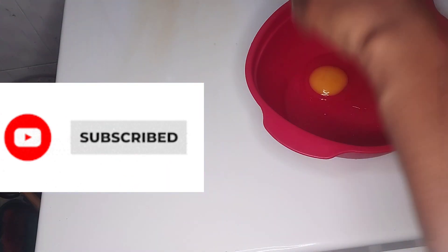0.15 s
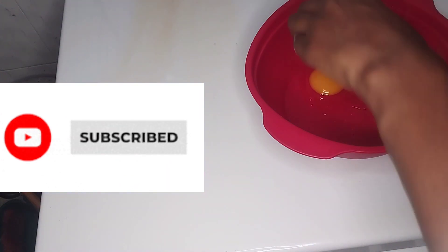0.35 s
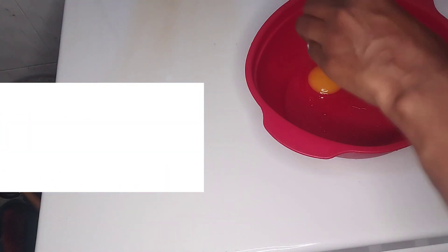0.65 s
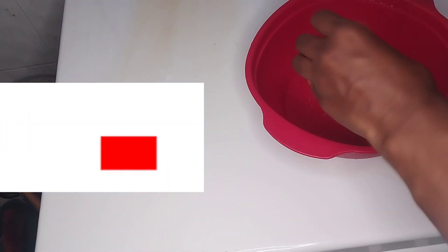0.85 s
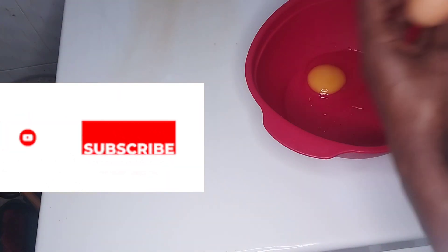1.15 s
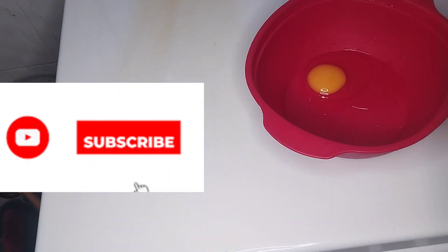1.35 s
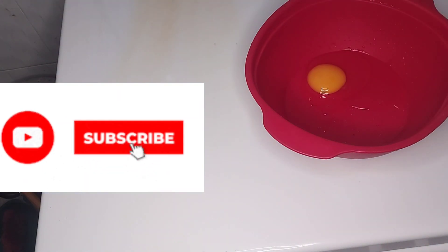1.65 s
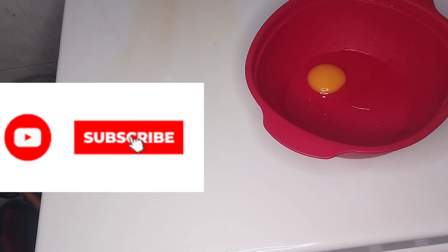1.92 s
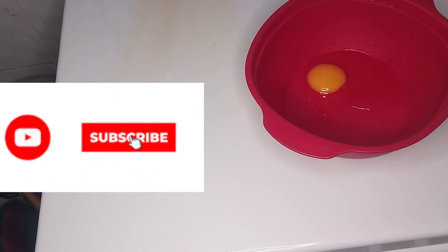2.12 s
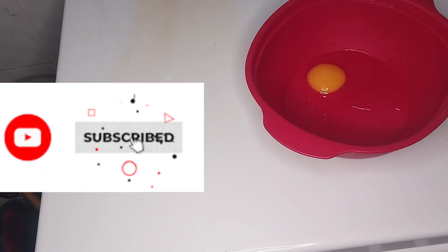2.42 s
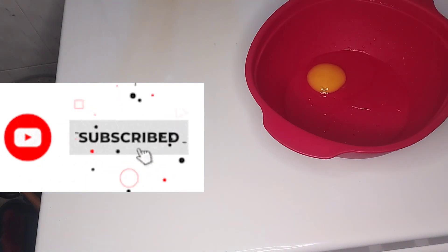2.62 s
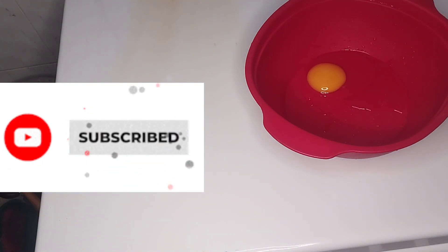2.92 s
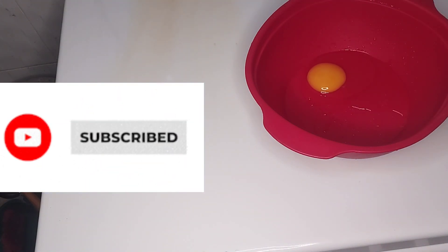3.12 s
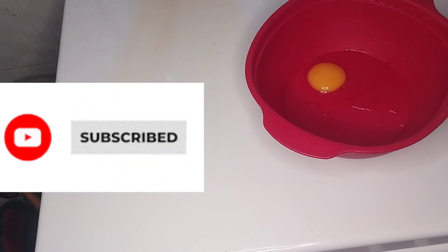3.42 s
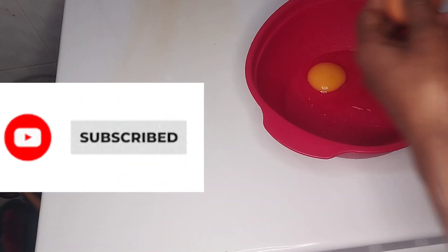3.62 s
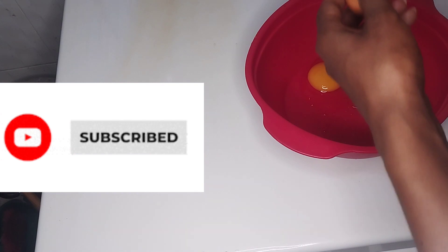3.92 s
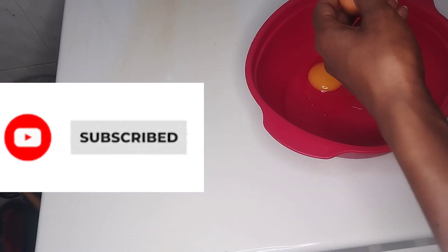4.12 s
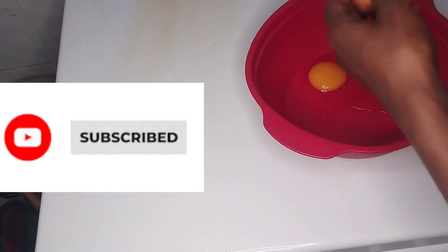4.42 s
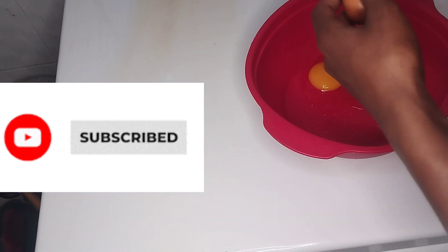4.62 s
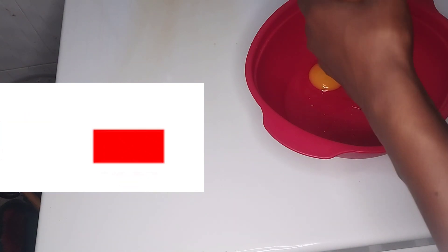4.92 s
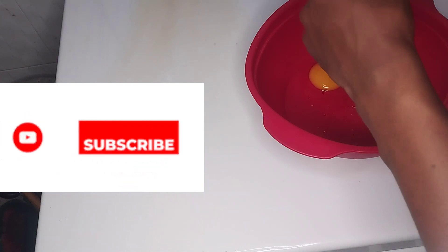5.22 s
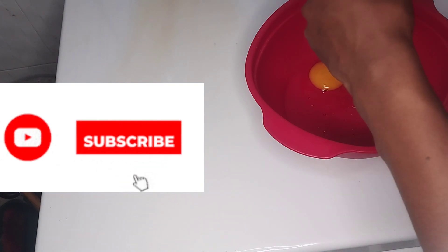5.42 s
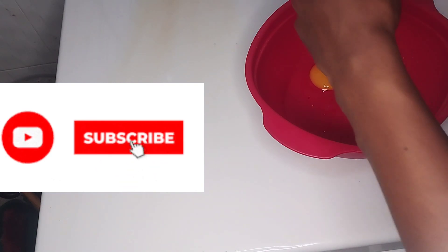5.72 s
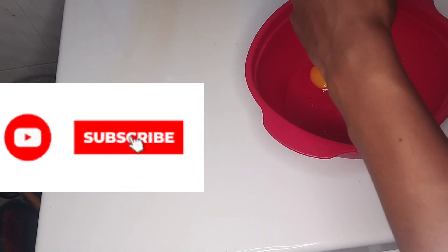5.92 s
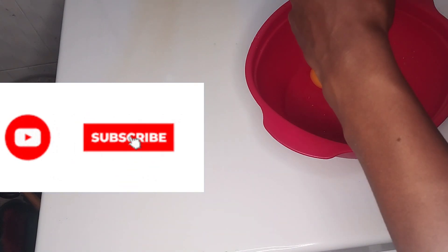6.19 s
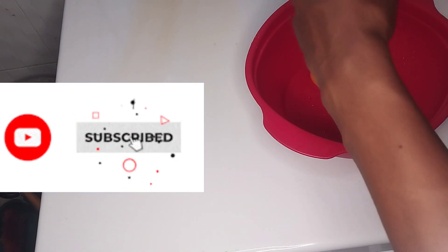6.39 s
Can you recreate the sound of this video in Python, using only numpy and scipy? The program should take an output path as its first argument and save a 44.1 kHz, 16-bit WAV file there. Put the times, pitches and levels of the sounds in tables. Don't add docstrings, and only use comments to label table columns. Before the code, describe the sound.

Quiet handling comes first: hollow eggshell touches, dry finger rubs, light scrapes, then a strong knock of hand or bowl on the counter. Padded bumps follow. Two bright, very close egg cracks on a plastic bowl ring round the live kitchen, the second louder. Brittle flakes snap and nails scrape until a short descending tear opens the shell. A distant motor hums low underneath, swelling now and then.

```python
import sys
import numpy as np
from scipy import signal
from scipy.fft import rfft, irfft
from scipy.io import wavfile

SR = 44100
rng = np.random.default_rng(int(sys.argv[2]) if len(sys.argv) > 2 else 0)


def invert_db(level):
    return 10 ** (np.asarray(level, dtype=float) / 20)


def wav_out(sig):
    wavfile.write(sys.argv[1], SR, np.round(np.clip(np.atleast_2d(sig).T, -1, 1) * 32767).astype(np.int16))


N = 288855

# frequency in Hz, level in dB.
SHELL_TONE = [(120, -76), (200, -19), (335, 0.5), (368, -3.5), (485, -0.5), (715, -10), (844, -9),
              (926, -15.5), (1500, -6.5), (2050, -12.5), (4530, -4.5), (6200, -2.5), (7880, -11),
              (15000, -9), (16500, -7.5)]

PORT_LAG = 11


def rms_one(x):
    return x / np.sqrt(np.mean(x ** 2) + 1e-20)


def at_hz(points, hz):
    points = np.array(points)
    return np.interp(np.log(hz), np.log(points[:, 0]), points[:, 1])


def band(x, low_hz, high_hz):
    edges_hz = [low_hz, min(high_hz, 0.45 * SR)]
    return signal.sosfilt(signal.butter(2, edges_hz, "band", fs=SR, output="sos"), x)


def colour(x, spectrum, size=4096):
    hz = np.arange(size // 2 + 1) * SR / size + 1
    cepstrum = irfft(np.log(invert_db(at_hz(spectrum, hz))))
    cepstrum[1:size // 2] *= 2
    cepstrum[size // 2 + 1:] = 0
    response = irfft(np.exp(rfft(cepstrum)))
    return signal.fftconvolve(x, [response / np.linalg.norm(response)], axes=1)[:, :N]


def ring(x, hz, t60):
    radius = invert_db(-60 / (t60 * SR))
    turn = 2 * np.pi * hz / SR
    return signal.lfilter([0, np.sin(turn)], [1, -2 * radius * np.cos(turn), radius * radius], x + 1e-18)


def diffuse(size, gain):
    # frequency in Hz, likeness from 0 to 1.
    likeness = [(20, 0.098), (60, 1), (130, 0.49), (400, 0.63), (1000, 0.064), (16000, 0.02)]
    out = 0
    edges = 10 * 2 ** np.arange(0, 11.1, 0.5)
    white = rng.standard_normal((2, 2, size))
    for k, (low, high) in enumerate(zip(edges, edges[1:])):
        mid, side = band(white[k % 2], low, high)
        centre = np.sqrt(low * high)
        alike = np.clip(at_hz(likeness, centre), 0, 1)
        stereo = np.sqrt(1 + alike) * mid + np.sqrt(1 - alike) * side * [[1], [-1]]
        out = out + gain(centre) * stereo
    return out


def kitchen(x, build_ms):
    # frequency in Hz, t60 in seconds.
    decay = [(150, 0.22), (400, 0.38), (1040, 0.36), (2760, 0.34), (7280, 0.3)]
    t = np.arange(int(0.6 * SR)) / SR

    def envelope(hz):
        swell = 1 - np.exp(-1000 * t / build_ms * (hz / 1000) ** 0.6)
        return swell * invert_db(-60 * t / at_hz(decay, hz))

    tail = diffuse(len(t), envelope)
    return signal.fftconvolve(x, tail / np.sqrt(np.sum(tail ** 2) / 2), axes=1)[:, :N]


def bursts(times, levels_db, lengths_ms, tops_hz=1e6):
    size = 4096
    out = np.zeros((*np.shape(levels_db)[:-1], N + size))
    noise = rng.standard_normal((len(times), size))
    age = np.arange(size) / SR * 2000 / np.maximum(lengths_ms, 0.1)[:, None]
    shape = age * np.exp(1 - age)
    for _ in range(4):
        spectrum = rfft(noise * shape ** 0.3)
        noise = irfft(spectrum / np.abs(spectrum))
    hz = np.arange(size // 2 + 1) * SR / size
    dulling = (1 + 1j * hz / np.reshape(tops_hz, (-1, 1))) ** -3
    noise = irfft(rfft(noise) * dulling) * np.sqrt(np.sum(shape ** 2, axis=1, keepdims=True))
    noise = noise * np.clip(3 - np.arange(size) / 1024, 0, 1)
    for k, s in enumerate(times):
        start = round(s * SR)
        out[..., start:start + size] += invert_db(levels_db[..., k, None]) * noise[k]
    return out[..., :N]


def swells(rows, rest_db, rise_db_per_s, fall_db_per_s):
    s, peak_db = np.transpose(rows)[:, :, None]
    late = np.arange(N) / SR - s
    slopes = peak_db + np.where(late < 0, rise_db_per_s * late, -fall_db_per_s * late)
    return invert_db(np.maximum(slopes.max(axis=0), rest_db))


def hush():
    # frequency in Hz, level in dB.
    hush_tone = [(5.9, -30), (10, 14.5), (28, -1.5), (75, -13.5), (127, -10.5), (173, -18), (276, -15),
                 (453, -24), (1150, -34.5), (2000, -34.5), (2570, -40.5), (5080, -41), (11000, -52),
                 (15000, -27), (16500, -53)]
    noise = diffuse(N + SR, lambda hz: invert_db(at_hz(hush_tone, hz)))
    return invert_db(-53.5) * rms_one(noise[:, SR:])


def drone():
    # peak time in seconds, peak level in dB.
    drone_peaks = [
        (0.42, -58),
        (1.6, -63),
        (2.43, -52),
        (3.15, -64.5),
        (4.08, -59),
        (6.38, -59.5),
    ]
    gain = swells(drone_peaks, rest_db=-71, rise_db_per_s=89.5, fall_db_per_s=78)
    return invert_db(-2.5) * gain * rms_one(ring(rng.standard_normal(N), 128, 0.45))


def clinks():
    # start in seconds, peak in dB, hollow pitch in Hz, click over 2.1 kHz in relative dB, ring t60 in
    # s.
    touches = [
        (0.375, -47, 1540, -7, 0.036),
        (1.0279, -52, 1490, 1, 0.039),
        (1.3885, -42.5, 1440, -14, 0.036),
        (1.8372, -53.5, 1390, -14, 0.027),
    ]
    # pitch ratio, level in dB.
    hollow_modes = [(0.901, -13), (0.998, -2), (1.13, -10.5), (1.3, -15)]
    s, level, hz, click, t60 = np.transpose(touches)
    hollow = 0
    for k in range(len(s)):
        push = bursts(s[k:k + 1], level[k:k + 1] - 31.0, [2.5])
        hollow = hollow + sum(invert_db(db) * ring(push, ratio * hz[k], t60[k]) for ratio, db in hollow_modes)
    tick = band(bursts(s, level + click - 0.5, 1.4 + 0 * s), 2100, 25000)
    dry = hollow + colour(tick[None], SHELL_TONE)
    return invert_db(7.5) * dry + invert_db(14) * kitchen(dry, build_ms=0.66)


def whispers():
    # start in seconds, peak in dB, centre in Hz, length in seconds.
    slips = [(0.42, -59.5, 1470, 0.13), (0.96, -46, 7660, 0.035), (1.41, -54, 1420, 0.066),
             (1.502, -64.5, 1280, 0.11), (1.43, -57, 860, 0.056), (4.885, -59, 1300, 0.036),
             (5.3, -56.5, 1800, 0.056), (5.343, -54, 12100, 0.031)]
    return [(s, db, hz, 0.22, -35, length) for s, db, hz, length in slips]


def scrapes():
    # start in seconds, peak in dB, centre in Hz, length in seconds.
    strokes = [(0.461, -55.5, 5600, 0.051), (1.382, -34, 5430, 0.02), (4.887, -51.5, 4450, 0.025),
               (5.01, -52.5, 4700, 0.12), (5.346, -48.5, 4790, 0.05), (5.633, -59.5, 3860, 0.05),
               (5.832, -61, 5000, 0.11), (6.204, -46, 6400, 0.036)]
    force_db, edge_db, edge_loss_per_db = -48.5, -12.5, 0.23
    return [(s, db, hz, 0.94, edge_db - edge_loss_per_db * (db - force_db), length)
            for s, db, hz, length in strokes]


def shell_parts(body, mid, edge):
    return band(body, 150, 1000) + band(mid, 1000, 7500) + band(edge, 7500, 19000)


def cracks():
    # start in seconds, peak in dB, body under 1 kHz in relative dB, edge over 7.5 kHz in relative dB,
    # left-right difference of the edge in dB, on top of the left port's fixed lead.
    fractures = [(0.4814, -50, -22, 0, 1), (2.199, -59, -22, 8, -5), (2.245, -33, -16, -6, -13),
                 (3.6805, -32, -2.5, -20, 18), (4.0364, -7.5, -19, -13.5, 11.5),
                 (4.351, -2.5, -24.5, -14.5, 13), (4.8541, -35, -19.5, -16, 0),
                 (5.0567, -35, -32, -10.5, 6), (5.097, -35, -40, -3, 8), (5.1724, -52, -2.5, 18.5, 3),
                 (6.0291, -45, -11, -1.5, -7), (6.208, -42, -7, -2.5, -4), (6.3322, -33, -34, -11, -3)]
    s, level, body, edge, pan = np.transpose(fractures)
    ms = np.full(len(s), 1.27)
    sides = np.array([[1], [-1]])
    panned = level + 0.5 * sides
    port_edge = panned + edge + 10 + sides * (7.9 + pan / 2)
    direct = shell_parts(*[bursts(s, db, ms) for db in (panned + body + 14, panned, port_edge)])
    direct += invert_db(-14) * ring(direct, 4700, 0.0020)
    direct[1] = np.roll(direct[1], PORT_LAG)
    at_spot = np.arange(len(s)) % 3 == [[0], [1], [2]]
    spots = shell_parts(*[bursts(s, np.where(at_spot, level + rel, -200), ms)
                          for rel in (body + 13, 0, edge + 10)])
    echoes = sum(kitchen(part[None], build_ms=1.3) for part in spots)
    return colour(invert_db(-12.5) * direct + invert_db(-8.0) * echoes, SHELL_TONE)


def rubs():
    # start in seconds, peak in dB, edge over 11 kHz in relative dB, length in seconds.
    strokes = [(0.856, -50.5, -19, 0.16), (1.141, -60, -26, 0.12), (1.24, -51, -21, 0.13),
               (1.61, -49.5, -23, 0.062), (2.083, -65.5, -24, 0.22), (3.5, -49.5, -25.5, 0.057),
               (3.921, -52.5, -20, 0.037), (3.96, -43, -17, 0.038), (4.628, -52.5, -7, 0.036),
               (5.094, -45.5, -11.5, 0.05), (6.439, -45, -13, 0.059)]
    return [(s, db, 2950, 1.9, edge_db, length) for s, db, edge_db, length in strokes]


def shifts():
    # start in seconds, peak in dB, centre in Hz, length in seconds.
    moves = [(0.86, -56.5, 573, 0.097), (2.623, -48.5, 78.8, 0.23), (3.1, -63.5, 630, 0.54),
             (6.018, -47, 300, 0.072), (6.216, -44, 300, 0.099), (6.319, -53.5, 287, 0.28),
             (6.448, -51, 550, 0.053)]
    return [(s, db, hz, 0.6, -35, length) for s, db, hz, length in moves]


def knocks():
    # start in seconds, peak in dB, slap in relative dB, top of the slap in Hz.
    hard = [
        (1.258, -48.5, -5.5, 7100),
        (1.632, -44.5, -7, 6000),
        (2.261, -31, -7.5, 9000),
        (2.3506, -10, -9.5, 15300),
    ]
    # start in seconds, peak in dB.
    padded = [(2.685, -44), (2.964, -40), (3.632, -44), (3.880, -41), (4.592, -42), (4.998, -44.5),
              (5.194, -45), (5.553, -45.5), (5.723, -44.5), (6.056, -49.5), (6.197, -44.5)]
    # frequency in Hz, level in dB, t60 in seconds before damping.
    counter_modes = [(308, -8.5, 1), (347, -17.5, 0.15), (380, -11.5, 0.73), (479, 5.5, 0.18),
                     (537, 3, 0.49), (660, -34, 0.7), (730, -1, 0.47), (910, -36.5, 0.94), (1210, -6, 0.19),
                     (1148, -43, 0.24)]
    # frequency in Hz, level in dB per Hz.
    thump_tone = [(41, -89), (70, -46.5), (108, -56), (205, -10), (253, 6), (421, -10.5), (461, -5.5),
                  (623, -8), (1600, -20), (2080, -77.5), (3520, -120)]
    # frequency in Hz, level in dB per Hz.
    slap_tone = [(530, -35.5), (900, -6), (1520, -18), (2080, -9.5), (2530, -14.5), (5070, -18.5),
                 (8350, -30.5), (15200, -30), (15900, -40.5), (16500, -96.5)]
    contact_ms, damping = 5.8, 0.12
    rows = np.array(hard + [(s, db, -7.5, 3130) for s, db in padded])
    out = 0
    for spot in range(3):
        s, level, slap, top_hz = rows[spot::3].T
        ms = np.full(len(s), contact_ms)
        push = bursts(s, level, ms)
        thump = invert_db(-6.5) * colour(push[None], thump_tone)
        modes = sum(invert_db(db - 31.5) * ring(push, hz, damping * t60) for hz, db, t60 in counter_modes)
        slaps = colour(bursts(s, level + slap + 3.5, 0.6 * ms, top_hz)[None], slap_tone)
        knock = invert_db(3.0) * band(push, 850, 1210)
        dry = band(thump + modes + slaps + knock, 100, 18000)
        out = out + invert_db(-11) * dry + kitchen(dry, build_ms=2.7)
    return out


def stir(grains):
    # peak time in seconds, peak level in dB.
    moves = [
        (1.5, -64),
        (2.39, -64),
        (5.11, -67),
        (6.27, -68.5),
    ]
    gain = swells(moves, rest_db=-82.5, rise_db_per_s=44.5, fall_db_per_s=78.5)
    return invert_db(-4) * gain * rms_one(band(grains[::-1], 1200, 8700))


def squeak():
    # start in seconds, peak in dB, multiple of the pitch, length in seconds.
    partials = [
        (1.82, -69, 1, .19),
        (1.73, -75, 2, .1),
        (1.75, -77, 4, .09),
    ]
    s, level_db, multiple, length = np.transpose(partials)[:, :, None]
    t = np.arange(N) / SR
    swell = np.sin(np.pi * np.clip((t - s) / length, 0, 1))
    return np.sum(invert_db(level_db) * swell * np.sin(2 * np.pi * 657 * multiple * t), axis=0)


def snaps():
    # start in seconds, peak in dB, ring in Hz, edge over 8 kHz in relative dB.
    flake_rows = [(4.8847, -43.5, 4700, -11), (5.0214, -55, 4370, -7.5), (5.028, -52, 4330, -7),
                  (5.046, -49, 4400, -13), (5.0794, -49, 4750, -2.5), (5.0924, -45, 4530, -5),
                  (5.1198, -45, 4430, -18), (5.1324, -50, 4260, -17), (5.141, -56, 4150, -3),
                  (5.6486, -54.5, 4030, -11.5), (5.7123, -61, 4000, -3), (5.8432, -56.5, 5000, -8),
                  (5.8556, -61, 4950, -18), (5.8666, -57, 4550, -20), (5.8746, -50, 5300, -13),
                  (5.9915, -51.5, 4400, -9.5), (6.133, -59, 4500, -12.5), (6.1424, -59, 4750, -8),
                  (6.359, -33, 5000, -7), (6.3744, -57, 4850, -15), (6.39, -33, 3700, -12),
                  (6.4794, -56, 3300, -6)]
    size = 400
    out = np.zeros(N)
    edges = rng.standard_normal((len(flake_rows), size))
    age = np.arange(size) / SR
    for (s, level_db, hz, edge_db), noise in zip(flake_rows, edges):
        flake = np.sin(2 * np.pi * hz * age) * np.exp(-age * hz / 3.5)
        flake += invert_db(edge_db + 11.5) * band(noise * np.exp(-age / 0.00051), 8100, 21000)
        out[round(s * SR):][:size] += invert_db(level_db + 1.5) * flake
    return out


def tears():
    start_s, step_s, length_s = 6.318, 0.013, 0.021
    level_db, growth_db, edge_db = -38.5, -0.13, -16.5
    first_hz, sink_octaves, octaves = 5600, 0.21, 0.8
    return [(start_s + k * step_s, level_db + k * growth_db, first_hz / 2 ** (k * sink_octaves),
             octaves, edge_db, length_s) for k in range(7)]


def handling():
    sizes = invert_db(4.5 * np.minimum(rng.exponential(1, N), 5)) * rng.choice([-1, 1], N)
    grains = rms_one(sizes * (rng.random(N) < 1800 / SR))
    dry = np.zeros(N)
    for s, level_db, hz, octaves, edge_db, length in whispers() + scrapes() + rubs() + shifts() + tears():
        start = round(s * SR)
        part = grains[start:][:round(length * SR)]
        along = np.linspace(0, 1, len(part))
        low, high = hz / 2 ** (octaves / 2), hz * 2 ** (octaves / 2)
        body = rms_one(band(band(part, low, high), low / 1.8, high * 1.5))
        edge = rms_one(band(part, 11000, 20000)) * invert_db(edge_db + 10.5)
        fade = np.minimum(8 * along, 1) * (1 - along ** 3)
        dry[start:][:len(part)] += invert_db(level_db - 12) * (body + edge) * fade
    dry += stir(grains)
    flakes = snaps()
    near = invert_db(-11) * dry + flakes
    echoes = kitchen((dry + invert_db(-8) * flakes)[None], build_ms=0.98)
    return np.array([near, np.roll(near, PORT_LAG)]) + invert_db(3.0) * echoes


def scene():
    return hush() + drone() + clinks() + cracks() + knocks() + squeak() + handling()


def band_limit(x):
    return signal.sosfilt(signal.butter(12, 16990, fs=SR, output="sos"), x)


def record(dry):
    x = dry
    for notch_hz, width_hz, depth in ((8060, 2300, 0.6), (11170, 2800, 0.75)):
        peak = signal.iirpeak(notch_hz, notch_hz / width_hz, fs=SR)
        x = x - depth * signal.lfilter(*peak, x)
    x = signal.sosfilt(signal.butter(7, 16050, fs=SR, output="sos"), x)
    x = signal.sosfilt(signal.cheby2(12, 70, 17300, fs=SR, output="sos"), x)
    return band_limit(x)


dry = scene()
out = record(dry)
wav_out(out)
```